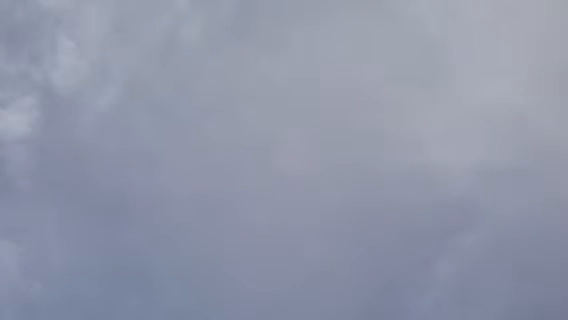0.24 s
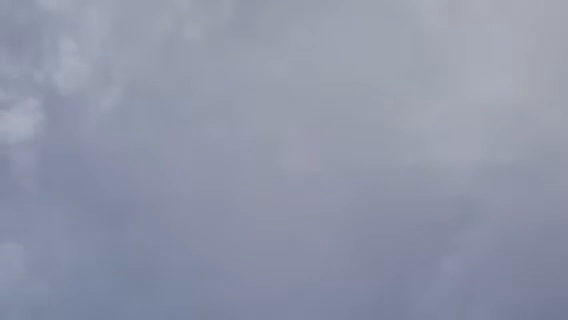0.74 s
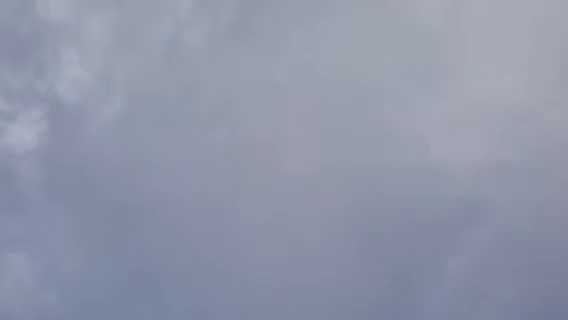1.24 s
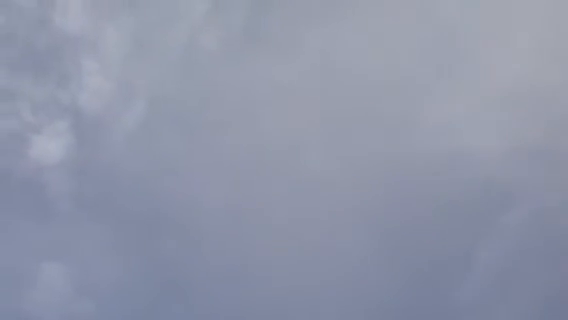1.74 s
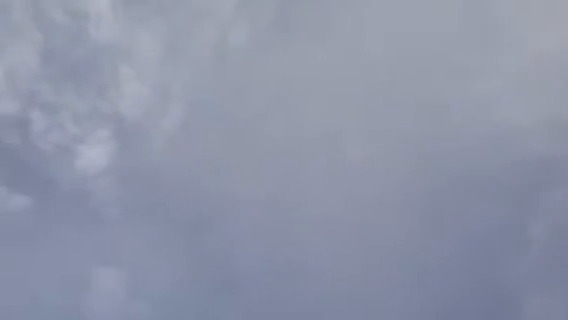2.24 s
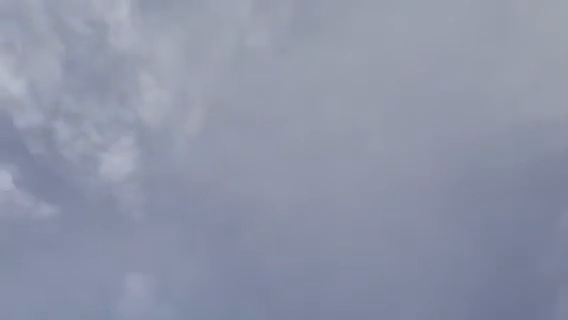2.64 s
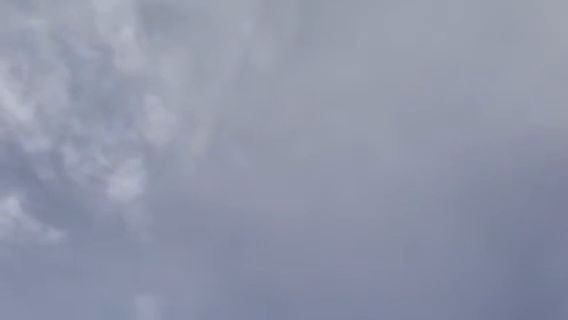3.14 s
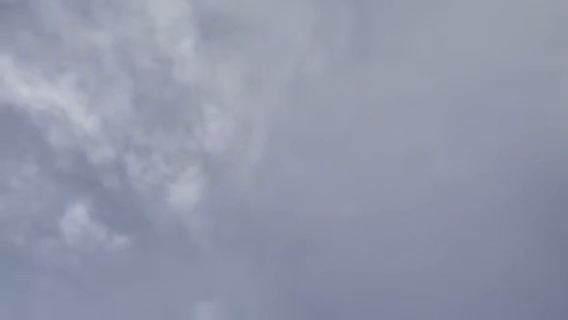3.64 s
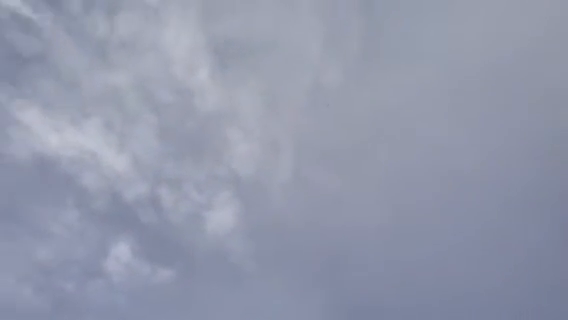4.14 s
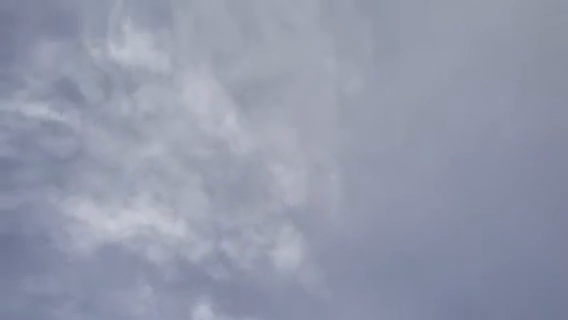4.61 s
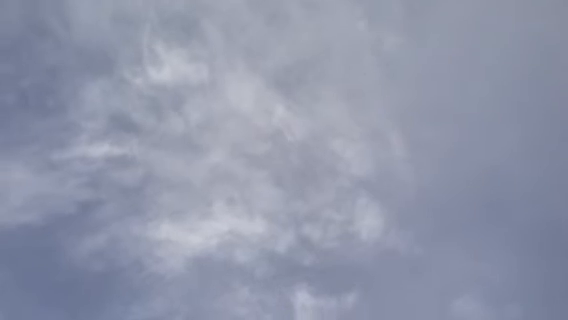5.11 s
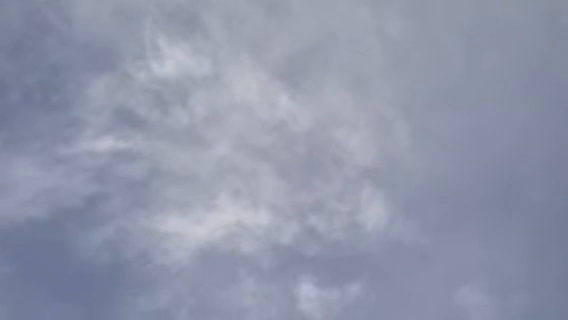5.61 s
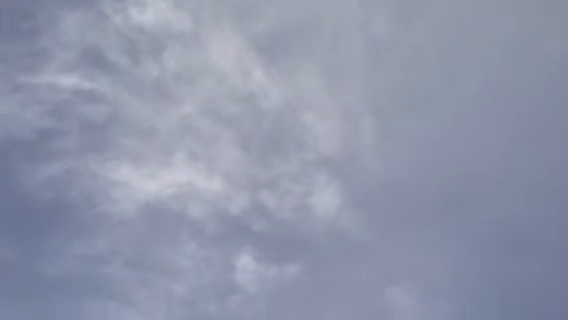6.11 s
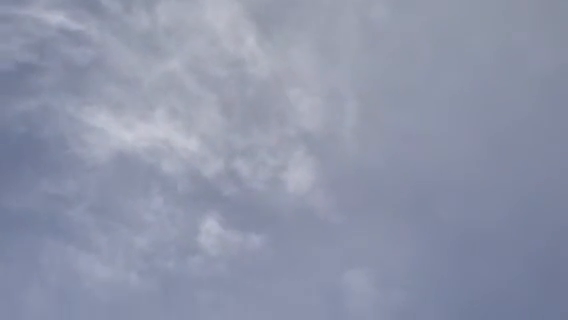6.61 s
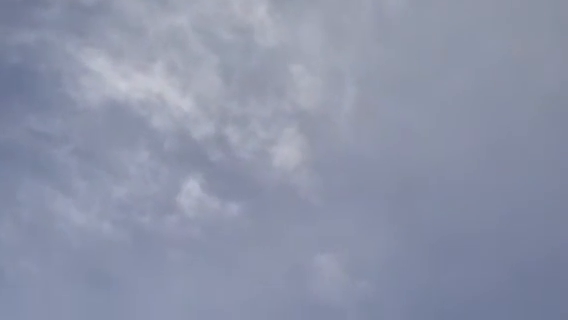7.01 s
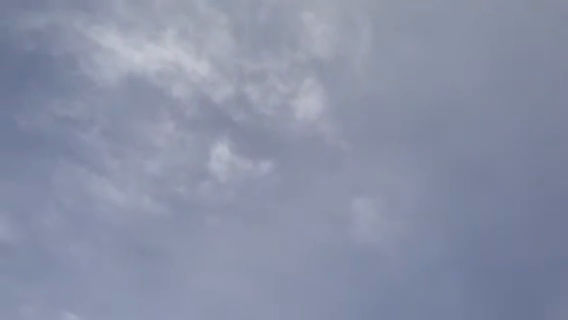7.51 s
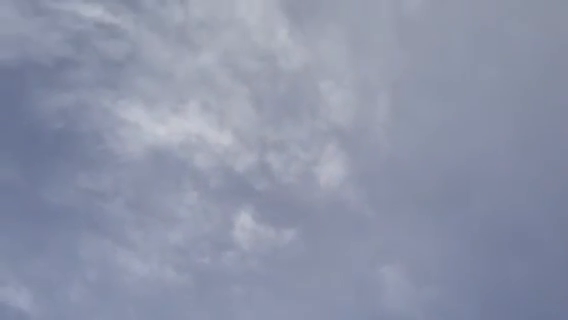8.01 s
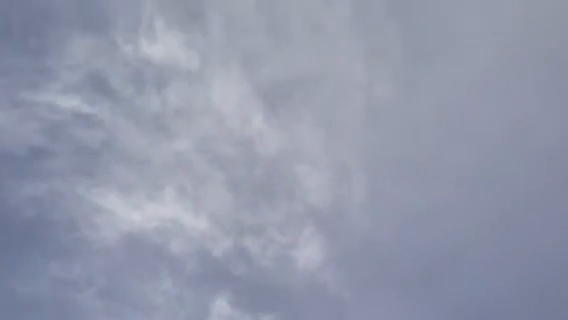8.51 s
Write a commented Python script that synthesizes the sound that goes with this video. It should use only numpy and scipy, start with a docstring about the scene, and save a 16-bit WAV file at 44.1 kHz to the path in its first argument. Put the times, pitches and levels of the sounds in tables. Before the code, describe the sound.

Pigeon feathers rustle and swish close by over a faint town rumble, then one sharp wing clap and a burst of hard, fluttering wingbeats fading away.

```python
"""A place among walls, far from a rumbling town: a pigeon rustles and swishes close by, claps its wings
once, sharply, as it takes off, and beats them hard. Friction noise makes the feathers, shaped by one effort
curve that also drives the draught; sweeps, cracking slaps and puffs of air ride on top.
Noise bursts make the clap, bands of sinking hiss the swishes, gliding sines the faint birds;
the walls answer with a diffuse noise tail, and filtered noise is the town."""
import sys
import numpy as np
from scipy import signal
from scipy.fft import rfft, irfft, next_fast_len
from scipy.io import wavfile
from scipy.ndimage import uniform_filter1d, map_coordinates

SR = 44100
rng = np.random.default_rng(int(sys.argv[2]) if len(sys.argv) > 2 else 0)


def store_wav(level_fs):
    """Save 16-bit WAV to argv[1]."""
    pcm = np.round(np.clip(np.atleast_2d(level_fs), -1, 1) * 32767)
    wavfile.write(sys.argv[1], SR, pcm.T.astype(np.int16))


N = 385875
TIME = np.arange(N) / SR
TOP_HZ = 15600  # band limit of the result

# colour of the distant town: f/Hz, relative density/dB
TOWN_SPECTRUM = [(15, -104), (25, -63), (107, -6.5), (183, 3), (221, -0.5), (389, -11.5), (421, -11),
                 (598, -5.5), (1170, -30.5), (2560, -14.5), (2920, -18.5), (3630, -15), (5140, -20.5),
                 (10900, -22.5), (15500, -23.5)]
# how long the walls ring: f/Hz, t60/s
WALL_DECAY = [(150, 1), (1000, 0.38), (3000, 0.66), (10000, 0.15)]

# bird levels are those before the birds' own mix gain
# upswept chirps: t/s, start f/Hz, level/dB
CHIRP_CALLS = [(.066, 2950, -59), (.134, 2565, -59), (.432, 3200, -60), (.578, 2900, -59.5),
               (2.579, 3200, -63), (2.84, 2550, -63), (4.002, 3550, -61), (4.155, 3300, -61)]
CHIRP_S, CHIRP_RISE = 0.024, 1.52  # length; end pitch over start pitch
# nearly level pips: t/s, length/s, start f/Hz, level/dB
PIP_CALLS = [(.085, .014, 3560, -55.5), (.283, 0.019, 4350, -66), (0.296, .025, 590, -61.5),
             (.358, 0.017, 2480, -65), (.452, .02, 2580, -60), (.456, .014, 3360, -58),
             (.6, 0.014, 3620, -53.5), (.606, .025, 2500, -61), (.866, .017, 10660, -55.5),
             (2.68, .03, 2210, -76), (3.26, .025, 2570, -69), (5.912, 0.056, 4480, -58.5),
             (5.988, 0.064, 3540, -55)]
PIP_RISE = 1.06  # end pitch over start pitch
# spells of far twittering: start t/s, end t/s, level/dB
TWITTER_SPELLS = [(0.02, 0.7, -71.5), (2.55, 3.102, -68.5)]

# air levels are those before the air's own mix gain
# soft thuds of pushed air: t/s, level/dB, f/Hz
PUFF_THUDS = [(1.298, -51.5, 318), (2.349, -38, 141), (2.478, -44, 144.4), (2.744, -47, 153),
              (3.215, -48, 142.6), (4.318, -50, 300), (4.647, -42, 246), (5.036, -41, 219),
              (5.515, -41, 177), (5.594, -40.5, 175), (6.866, -33.5, 167), (7.528, -36, 277),
              (7.728, -46.5, 284)]
# colour of the eddies round a thud: f/Hz, relative density/dB
EDDY_SPECTRUM = [(15, -45), (25, -15), (102, -26), (145, 3), (227, -9.5), (285, -10.5), (425, -33),
                 (600, -14), (780, -71), (1320, -120)]
# colour of the stirred air: f/Hz, relative density/dB
DRAUGHT_SPECTRUM = [(15, -80), (25, -30), (81, -17), (118, -4), (177, 3.5), (325, -10.5), (424, -12),
                    (450, -9), (580, -56), (990, -120)]
# boom of the stirred air: f/Hz, width/Hz, lift/dB
DRAUGHT_BOOM = [(184, 16, 3.5)]
WAKE_DB, WAKE_RISE_S, WAKE_T60_S = -35, 0.024, 1.6  # the air swirls on after the clap

# effort of the wings before take-off: t/s, level/dB
EFFORT_BEFORE = [(0.0, -59), (0.18, -68), (1.27, -67), (1.49, -61), (1.87, -66), (2.87, -65), (3.4, -71.5),
                 (4.05, -65.5), (4.69, -54), (4.93, -49), (5.13, -55.5), (5.45, -50.5)]
# effort of the wings after take-off: t/s, level/dB
EFFORT_AFTER = [(5.85, -54), (6.05, -51), (6.46, -42.5), (6.79, -40.5), (7.55, -46.5), (7.71, -52.5),
                (8.01, -60), (8.53, -57), (8.75, -59)]
# what the effort drives, in dB over it: moving air, rasping vanes, hissing barbs, low draught
SLIDE_AIR_DB, SLIDE_VANE_DB, SLIDE_BARB_DB, DRAUGHT_DB = -3, -3, -7, -0.5

# swishes close by: t/s, rise/s, hold/s, t60/s, level/dB, lower edge f/Hz, upper edge f/Hz,
# fall/(octaves per s), high hiss/dB, reflection/dB
SWISH_PASSES = [(4.26, 0.026, 0.022, 0.092, -42, 1670, 3150, 4.1, -11, -25),
                (4.431, 0.03, 0.043, 1, -42.5, 1900, 3780, 0.21, -9.5, -22),
                (4.768, 0.0036, 0.042, 0.8, -37.5, 2280, 6800, 3.6, -15, -6),
                (5.37, 0.066, 0.096, 0.75, -40, 1110, 2250, 3.2, -11, -25),
                (8.297, 0.029, 0.015, 0.17, -41.5, 1400, 2310, 1.6, -20.5, -11)]
# colour of the swishes: f/Hz, width/Hz, lift/dB
SWISH_RESONANCES = [(2170, 200, 6.5), (2590, 120, 8), (3680, 67, -2), (4640, 200, 0), (5460, 260, 0),
                    (6300, 160, 4)]
REFLECTION_S = 0.00108  # lag of the swishes' close reflection
# a short run of hollow wingbeats, loudest in the middle
RUN_START_S, BEAT_S, RUN_DB, RUN_EDGE_DB = 1.422, 0.114, -52, -4.5

# colour of feathers: f/Hz, relative density/dB
FEATHER_SPECTRUM = [(120, -29), (200, 5.5), (352, 1), (430, -5.5), (618, -5.5), (690, -6), (1280, -5.5),
                    (1910, 0), (2330, -3.5), (2750, -5.5), (3960, -11), (6960, -15), (9310, -20.5),
                    (14700, -25.5), (15500, -27)]
# a wing sweeps through the air: t/s, length/s, drive level/dB, brightness/dB
WING_SWEEPS = [(0.016, 0.024, -65, -5), (0.124, 0.04, -64.5, -12), (0.94, 0.054, -68.5, 10),
               (1.232, 0.028, -58, -1), (1.288, .022, -61.5, -9), (1.475, .025, -62, -9),
               (1.594, .035, -60, -6), (1.661, .022, -59, 2), (1.833, 0.014, -70, 15.5),
               (2.321, 0.051, -59, -14), (2.473, 0.02, -57.5, -6), (2.71, 0.053, -62, 1),
               (2.96, 0.055, -60.5, -1.5), (3.186, 0.041, -61, 0.5), (3.557, 0.037, -60, -4),
               (3.79, 0.014, -62.5, 0), (4.102, 0.041, -53.5, 2.5), (4.914, 0.02, -48, 0),
               (5.032, 0.043, -48, -4.5), (5.297, 0.025, -54, -2), (6.03, 0.043, -48, 4),
               (6.151, 0.02, -47.5, 4.5), (6.19, 0.031, -40, -5.5), (6.306, 0.082, -36.5, -3.5),
               (6.387, 0.085, -37.5, 4), (6.523, 0.022, -40, -1), (7.199, 0.029, -46, -13),
               (7.292, 0.027, -48, -14), (7.501, 0.042, -51, -9.5), (7.808, 0.013, -55.5, 8)]
SWEEP_RISE_SHARE, SWEEP_T60_S = 0.32, 0.092
# a wing slaps against feathers: t/s, length/s, drive level/dB, brightness/dB
WING_SLAPS = [(2.11, 0.013, -51.5, 2.5), (2.145, .03, -54, 2.5), (2.258, 0.016, -45.5, 6.5),
              (3.591, 0.0045, -56, -9.5), (4.376, 0.0033, -61, -1), (4.586, .002, -53, -2),
              (6.264, 0.0015, -39, -1), (6.456, 0.0024, -37, -4), (6.553, 0.0015, -27.5, 0),
              (6.637, 0.031, -33.5, 2.5), (6.712, 0.022, -34, -2), (6.8, 0.0052, -32.5, 1.5),
              (6.856, 0.044, -33, 0.5), (6.953, 0.0048, -38, 4.5), (7.061, 0.0037, -32.5, 5.5),
              (7.073, 0.015, -33.5, 1.5), (7.143, 0.0066, -36.5, -3.5), (7.398, 0.0032, -38, 5),
              (7.588, 0.0033, -30, -3), (7.73, 0.011, -51, -7.5), (7.948, 0.02, -48.5, -2),
              (8.148, 0.0045, -50, 1), (8.477, 0.0048, -44.5, 6), (8.529, 0.0081, -46.5, 7.5),
              (8.602, 0.011, -52, 0)]
SLAP_RISE_S, SLAP_T60_S, SLAP_T60_PER_LENGTH = 0.0007, 0.055, 1.6  # longer contacts die more slowly
QUILL_DB = 9  # peak of the crack that opens a slap, over the slap's drive level
STROKE_AIR_DB, STROKE_BARB_DB = -6.5, -6.5  # against the vanes; brightness trades air for barbs

# the take-off clap, then its echoes: t/s, level/dB, t60/s, treble/dB
CLAP_ARRIVALS = [(5.512, -16.5, 0.16, 2), (5.561, -24, 0.22, -10.5), (5.631, -27.5, 0.14, -9.5),
                 (5.645, -30.5, 0.28, -21)]
# colour of the clap: f/Hz, relative density/dB
CLAP_SPECTRUM = [(88, -35), (150, 0), (225, -6), (308, -21), (618, -4), (736, -16.5), (1150, -5),
                 (2140, 0.5), (2980, -9), (7410, -12.5), (8490, -22), (12500, -27), (15500, -32)]
# ring of the clap: f/Hz, width/Hz, lift/dB
CLAP_RESONANCES = [(664, 22, 6), (857, 58, 9), (1160, 34, 9), (1495, 22, 10), (1760, 260, 4), (2507, 77, 7),
                   (5140, 140, 4.5)]


def amp(db):
    """Decibels to gain."""
    return 10 ** (np.asarray(db) / 20)


def unit(x):
    """Scale to rms 1."""
    return x / np.sqrt(np.mean(x ** 2) + 1e-20)


def along(points, hz):
    """Read (Hz, value) points on a log frequency axis."""
    f, v = np.transpose(points)
    return np.interp(np.log(hz + 1), np.log(f + 1), v)


def below(hz, edge_hz, order=4):
    """Gain of a low-pass slope."""
    return 1 / np.sqrt(1 + (hz / edge_hz) ** (2 * order))


def above(hz, edge_hz, order=4):
    """Gain of a high-pass slope."""
    return below(edge_hz, hz + 1, order=order)


def bumps(modes, hz):
    """The lift in dB that (Hz, width, dB) resonances give."""
    return sum(db / (1 + (2 * (hz - centre) / width) ** 2) for centre, width, db in modes)


def colour(x, gain, size=4096):
    """Causal (minimum-phase) filter of unit energy with the given gain over frequency."""
    log_gain = np.log(np.maximum(gain(np.fft.rfftfreq(size, 1 / SR)), 1e-6))
    # folding the cepstrum forward makes the response causal
    cepstrum = irfft(log_gain)
    cepstrum[1:size // 2] *= 2
    cepstrum[size // 2 + 1:] = 0
    response = irfft(np.exp(rfft(cepstrum)))
    return signal.oaconvolve(x, response / np.linalg.norm(response))[:len(x)]


def wobble(rate):
    """A smooth random curve, rate knots a second."""
    knots = rng.standard_normal(int(N * rate / SR) + 4)
    return map_coordinates(knots, [TIME * rate])


def add(track, s, sound):
    """Mix a sound into the track at time s."""
    part = track[max(round(s * SR), 0):][:len(sound)]
    part += sound[:len(part)]


def swell(t, rise, hold, t60):
    """An envelope that rises, holds and dies away."""
    attack = np.sin(np.pi / 2 * np.clip(t / rise, 0, 1)) ** 2
    return attack * amp(-60 * np.maximum(t - rise - hold, 0) / t60)


def town():
    """Distant traffic rumble and a faint hiss: coloured noise whose level drifts slightly."""
    noise = colour(rng.standard_normal(N), lambda hz: amp(along(TOWN_SPECTRUM, hz)))
    return amp(-63.0 + 0.55 * wobble(4.25)) * noise


def walls(x, delay=0.006):
    """Diffuse answer of the walls: a noise tail that dies at its own rate per frequency, treble first."""
    hz, t, z = signal.stft(rng.standard_normal(SR * 3 // 4), SR, nperseg=256)
    decay = amp(-60 * t / along(WALL_DECAY, hz)[:, None])
    tail = signal.istft(z * decay, SR, nperseg=256)[1]
    tail = np.pad(tail, (int(delay * SR), 0))
    return signal.fftconvolve(x, tail / np.linalg.norm(tail))[:N]


def whistle(length, start_hz, end_hz, bend=2.68):
    """A thin whistle: one sine whose pitch bends mostly towards its end."""
    u = np.linspace(0, 1, int(length * SR))
    pitch = start_hz + (end_hz - start_hz) * u ** bend
    envelope = np.sqrt(np.abs(np.sin(np.pi * u)))
    return envelope * np.sin(2 * np.pi * np.cumsum(pitch) / SR)


def chirps(count=13, far_hz=2900):
    """A few nearer chirps stand out of the twitter of farther birds, count calls a spell."""
    near, far = np.zeros((2, N))
    for s, start_hz, db in CHIRP_CALLS:
        add(near, s, amp(db) * whistle(CHIRP_S, start_hz, CHIRP_RISE * start_hz))
    for s, length, start_hz, db in PIP_CALLS:
        add(near, s, amp(db) * whistle(length, start_hz, PIP_RISE * start_hz))
    for start, end, db in TWITTER_SPELLS:
        for when, height, glide in rng.random((count, 3)):
            pitch_hz = far_hz * 2 ** (height - 0.5)
            call = whistle(0.0358, pitch_hz, pitch_hz * (0.9 + 0.37 * glide))
            add(far, start + when * (end - start), amp(db) * call)
    # far calls arrive by many paths and break up
    return near + far * wobble(160)


def effort_db():
    """How hard the wings work at each moment."""
    return np.interp(TIME, *np.transpose(list(EFFORT_BEFORE) + list(EFFORT_AFTER)))


def air(eddy_db=-4, puff_t60=0.19):
    """Downstrokes push low thuds, wrapped in eddies, into a draught of effort and clap wake."""
    pushes, t = np.zeros(N), np.arange(SR // 2) / SR
    for s, db, pitch_hz in PUFF_THUDS:
        eddies = unit(colour(rng.standard_normal(len(t)), lambda hz: amp(along(EDDY_SPECTRUM, hz))))
        thud = np.sin(2 * np.pi * pitch_hz * t) + amp(eddy_db) * eddies
        add(pushes, s, amp(db) * thud * swell(t, 0.0045, 0.009, puff_t60))
    wake = amp(WAKE_DB) * swell(TIME - CLAP_ARRIVALS[0][0], WAKE_RISE_S, 0, WAKE_T60_S)
    strength = np.hypot(amp(effort_db() + DRAUGHT_DB), wake)
    swirl = strength * amp(1.5 * wobble(25)) * rng.standard_normal(N)
    tone = lambda hz: amp(along(DRAUGHT_SPECTRUM, hz) + bumps(DRAUGHT_BOOM, hz))
    return pushes + colour(swirl, tone)


def friction(slip_rate, slip_db, clump_db):
    """Barbs slipping over each other: millisecond ticks of uneven size on a clumpy hiss."""
    ticks = (rng.random(N) < slip_rate / SR) * rng.exponential(size=N) ** 2
    power = signal.lfilter([1], [1, -np.exp(-1000 / SR)], ticks)  # each tick decays over 1 ms
    slips = np.sqrt(1 + amp(slip_db) ** 2 * power / power.mean())
    return unit(rng.standard_normal(N) * slips * amp(clump_db * wobble(130)))


def wingbeats(count=3, rise=0.01, hold=0.013, t60=0.24, low_hz=770, high_hz=1250, fall=0.9,
              hiss_db=-16, echo_db=-18):
    """Evenly spaced hollow swishes that swell and fade, as rows like those of SWISH_PASSES."""
    rows = []
    for k, place in enumerate(np.linspace(-1, 1, count)):
        level_db = RUN_DB + RUN_EDGE_DB * place ** 2
        rows.append((RUN_START_S + k * BEAT_S, rise, hold, t60, level_db,
                     low_hz, high_hz, fall, hiss_db, echo_db))
    return rows


def swishes(hiss_top_hz=10500):
    """Brushes close by: bands of grainy hiss that sink in pitch, combed by a close reflection."""
    out, t = np.zeros(N), np.arange(SR * 3 // 4) / SR
    rub = friction(slip_rate=500, slip_db=-8, clump_db=1)
    rows = list(SWISH_PASSES) + wingbeats()
    for s, rise, hold, t60, db, low_hz, high_hz, fall, hiss_db, echo_db in rows:
        grain = np.roll(rub, -round(s * SR))[:len(t)]
        hz, when, z = signal.stft(grain, SR, nperseg=512)
        # raising the frequency axis with time makes the band fall
        sunk = hz[:, None] * 2 ** (fall * when)
        skirt = amp(hiss_db) * below(sunk, hiss_top_hz, order=3) * below(sunk, 2 * high_hz, order=1)
        band = above(sunk, low_hz, order=3) * (below(sunk, high_hz, order=9) + skirt)
        comb = np.abs(1 + amp(echo_db) * np.exp(2j * np.pi * hz * REFLECTION_S))
        band = band * (comb * amp(bumps(SWISH_RESONANCES, hz)))[:, None]
        shaped = z * band / np.linalg.norm(band, axis=0)
        hiss = unit(signal.istft(shaped, nperseg=512)[1][:len(t)])
        add(out, s, amp(db) * hiss * swell(t, rise, hold, t60))
    return out


def strokes():
    """Every sweep and slap as (start, envelope, brightness): sweeps swell, slaps start at once."""
    t = np.arange(SR // 3) / SR
    for s, length, db, bright_db in WING_SWEEPS:
        rise = SWEEP_RISE_SHARE * length
        yield s, amp(db) * swell(t, rise, length - rise, SWEEP_T60_S), bright_db
    for s, length, db, bright_db in WING_SLAPS:
        t60 = SLAP_T60_S + SLAP_T60_PER_LENGTH * length
        yield s, amp(db) * swell(t, SLAP_RISE_S, length, t60), bright_db


def wings(air_hz=1200, barb_hz=3600):
    """Strokes drive moving air, rasping vanes and hissing barbs; feathers slide with the effort."""
    rub = friction(slip_rate=300, slip_db=-4, clump_db=1.4)
    sliding_db = effort_db() + 1.8 * wobble(32)
    # (band, dB in a stroke, response to brightness, dB while sliding)
    parts = [(lambda hz: above(hz, 269) * below(hz, air_hz), STROKE_AIR_DB, -1, SLIDE_AIR_DB),
             (lambda hz: above(hz, air_hz) * below(hz, barb_hz), 0, 0, SLIDE_VANE_DB),
             (lambda hz: above(hz, barb_hz), STROKE_BARB_DB, 1, SLIDE_BARB_DB)]
    out = np.zeros(N)
    for band, stroke_db, lean, slide_db in parts:
        beats = np.zeros(N)
        for s, envelope, bright_db in strokes():
            add(beats, s, amp(stroke_db + lean * bright_db) * envelope)
        force = np.hypot(beats, amp(sliding_db + slide_db + wobble(60)))
        # random signs: the three bands share the slips but not the waveform
        rasp = force * rub * rng.choice([-1, 1], N)
        out += colour(rasp, lambda hz: band(hz) * amp(along(FEATHER_SPECTRUM, hz)))
    return out


def patchy(x, depth_db=2.0, size=7):
    """Uneven feather noise: a smooth random gain over time and frequency makes its colour patchy."""
    z = signal.stft(x, nperseg=512)[2]
    field = rng.standard_normal(z.shape)
    for axis in (0, 1, 0, 1):
        field = uniform_filter1d(field, size - 2 * axis, axis=axis)
    return signal.istft(z * amp(depth_db * unit(field)), nperseg=512)[1][:N]


def snaps(t60=0.012, treble_hz=4000):
    """A quill springs free at the start of each slap: a crack of a few milliseconds."""
    out, t = np.zeros(N), np.arange(SR // 12) / SR
    for s, _, db, bright_db in WING_SLAPS:
        burst = rng.standard_normal(len(t)) * swell(t, 0.00016, 0, t60)
        treble = lambda hz: bright_db * above(hz, treble_hz, order=2)
        crack = colour(burst, lambda hz: amp(along(FEATHER_SPECTRUM, hz) + treble(hz)))
        add(out, s, amp(db + QUILL_DB) * crack / np.abs(crack).max())
    return out


def bounce(x, delay, db):
    """Add one reflection from a surface close by."""
    reflection = np.interp(TIME - delay, TIME, x, left=0)
    return (x + amp(db) * reflection) / np.hypot(1, amp(db))


def clap(rise=0.00093, hold=0.0071, treble_hz=3200):
    """The wings meet over the back, a ringing noise burst; farther walls return it duller."""
    out, t = np.zeros(N), np.arange(SR // 2) / SR
    for s, db, t60, treble_db in CLAP_ARRIVALS:
        burst = rng.standard_normal(len(t)) * swell(t, rise, hold, t60)
        treble = lambda hz: treble_db * above(hz, treble_hz, order=2)
        tone = lambda hz: amp(along(CLAP_SPECTRUM, hz) + bumps(CLAP_RESONANCES, hz) + treble(hz))
        add(out, s, amp(db) * colour(burst, tone))
    return out


def scene():
    """The town, the birds and the near pigeon, with the answer of the walls."""
    birds = chirps()
    feathers = bounce(patchy(wings()) + snaps(), delay=0.0033, db=-25)
    pigeon = feathers + clap() + swishes()
    answer = walls(amp(-13) * pigeon + amp(-1) * birds)
    return (town() + answer + amp(2.0) * birds + amp(-1.5) * air() + pigeon)[None]


def record(dry):
    """Keep nothing above the band limit."""
    size = next_fast_len(N + SR // 4)
    kept = np.fft.rfftfreq(size, 1 / SR) < TOP_HZ
    return irfft(rfft(dry, size) * kept, size)[:, :N]


dry = scene()
out = record(dry)
store_wav(out)
```